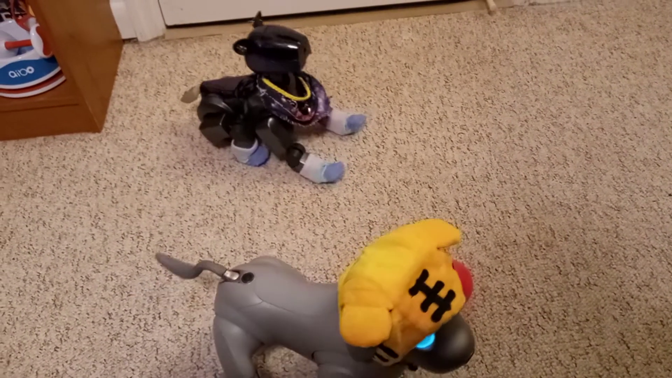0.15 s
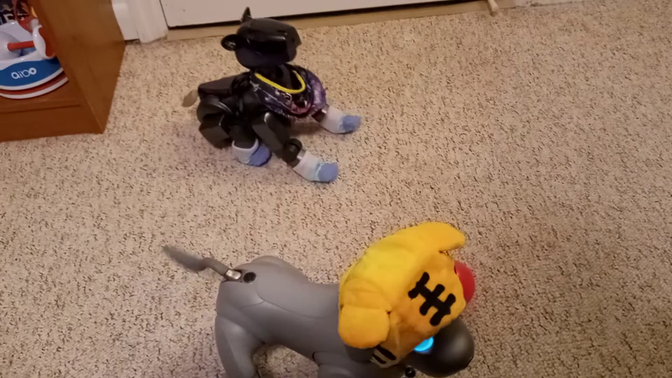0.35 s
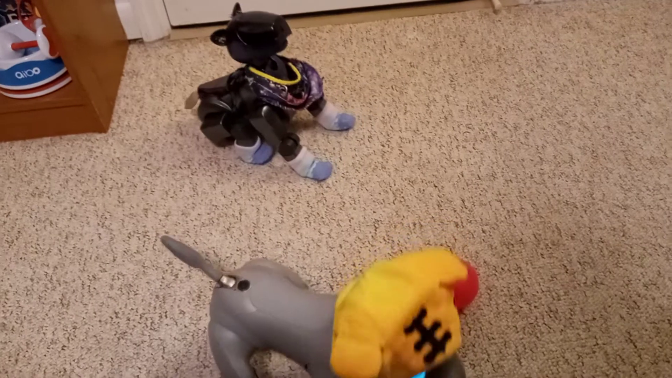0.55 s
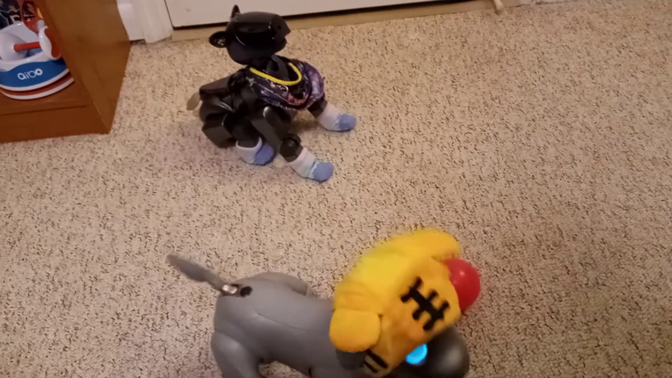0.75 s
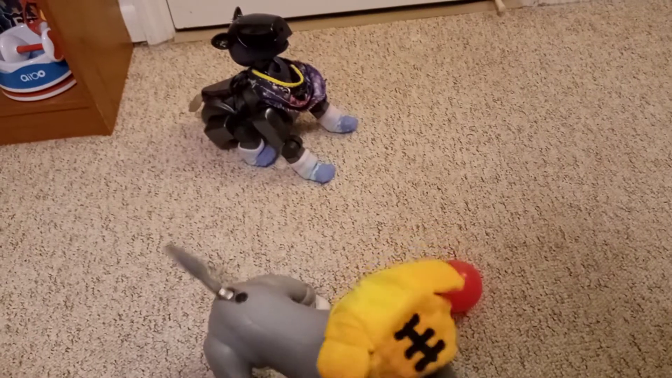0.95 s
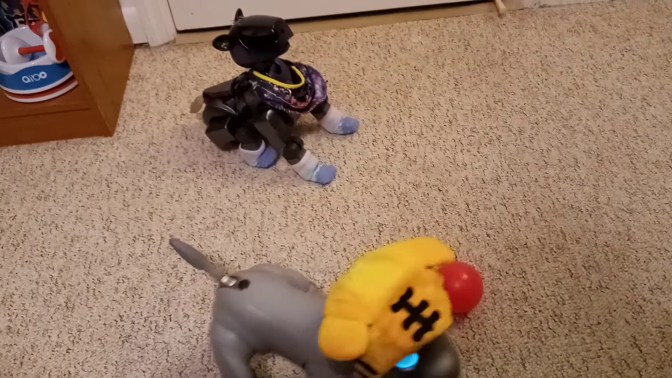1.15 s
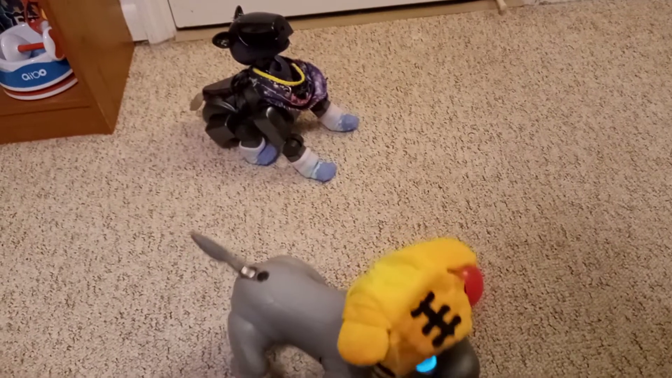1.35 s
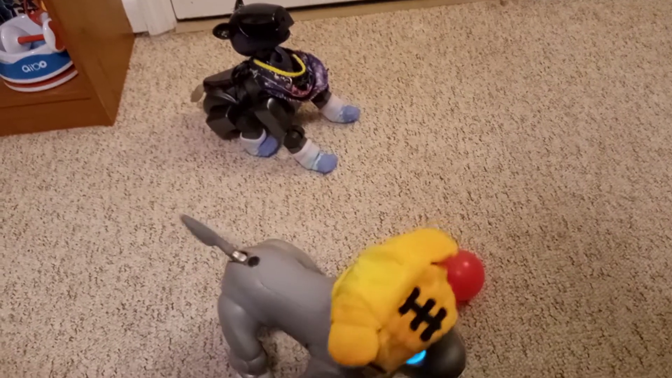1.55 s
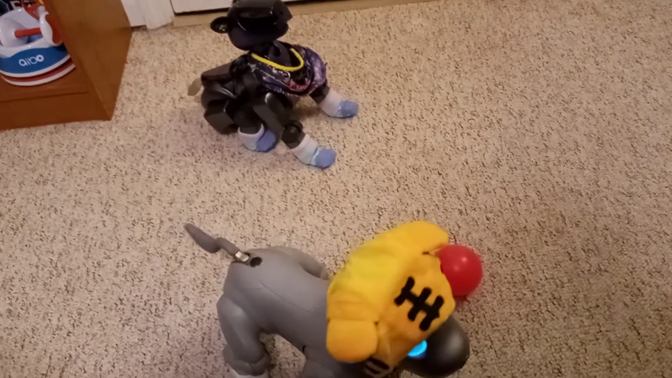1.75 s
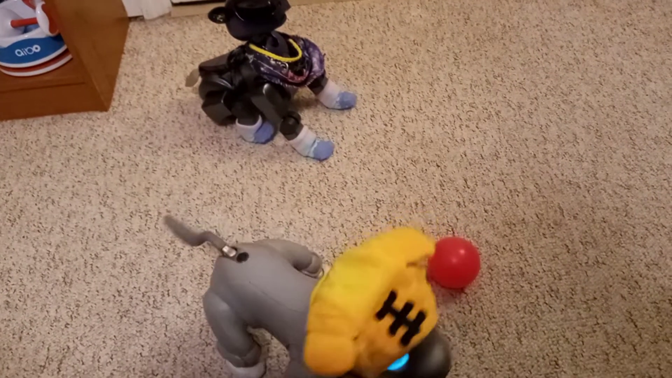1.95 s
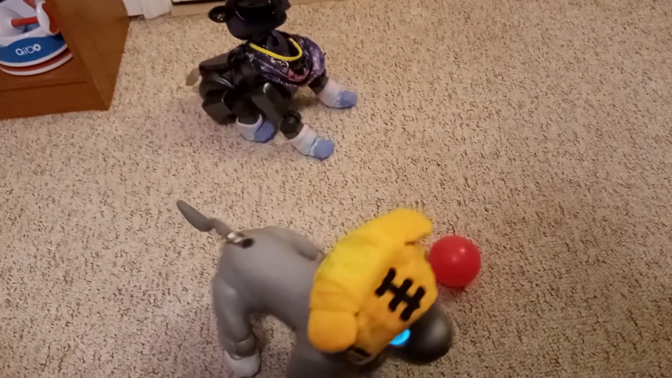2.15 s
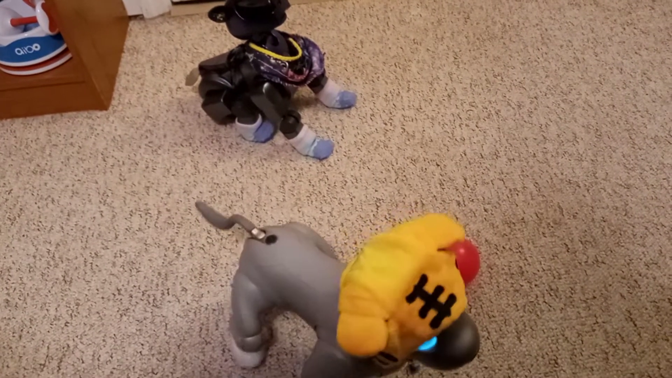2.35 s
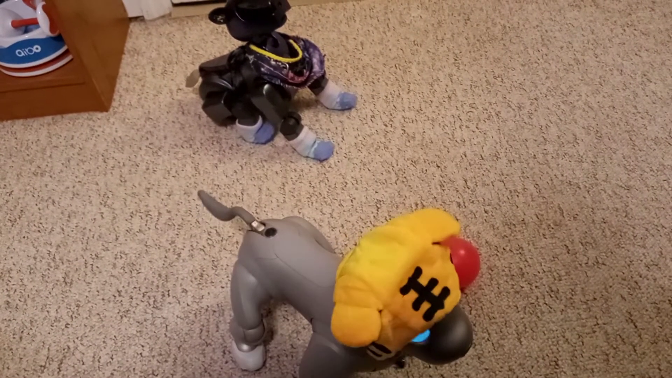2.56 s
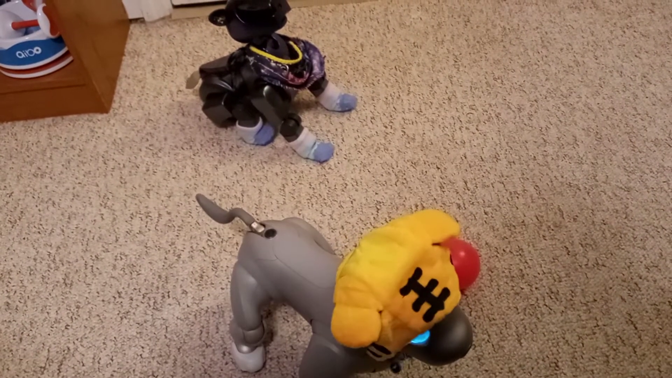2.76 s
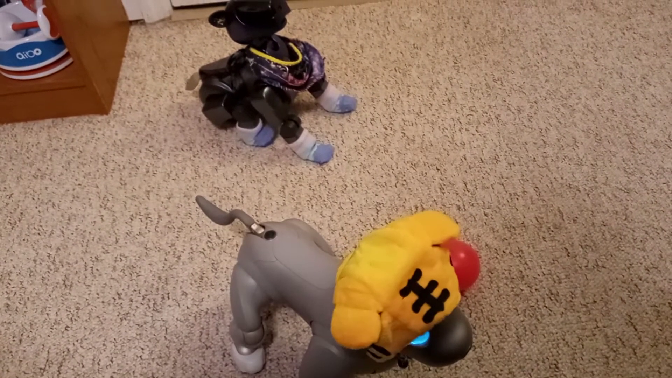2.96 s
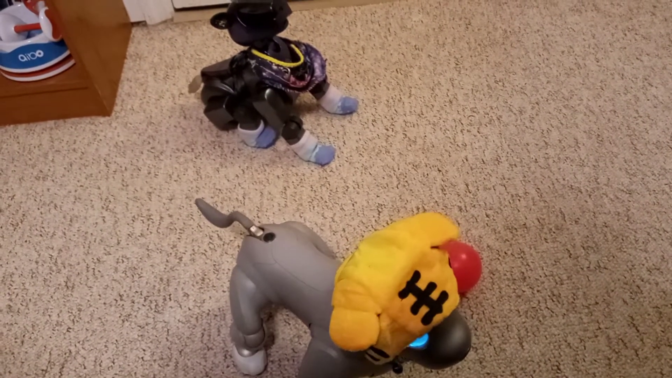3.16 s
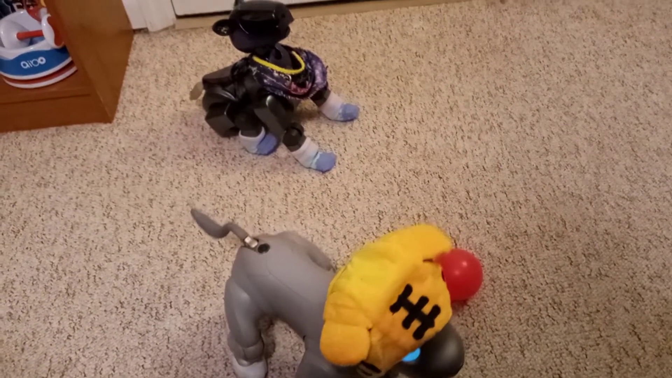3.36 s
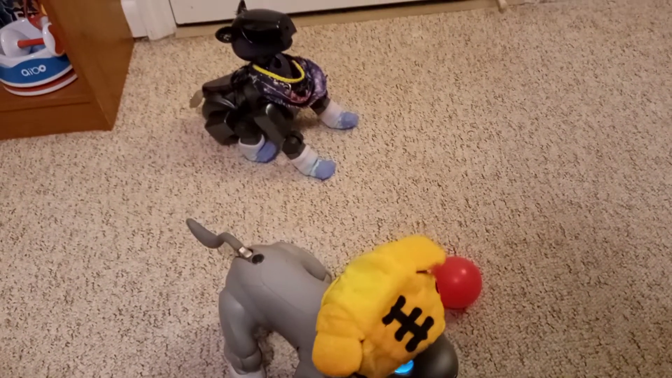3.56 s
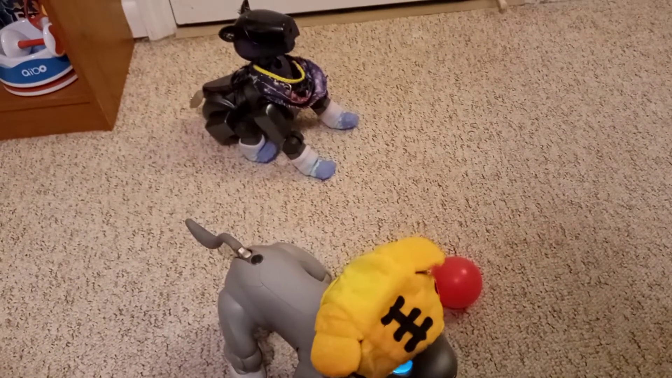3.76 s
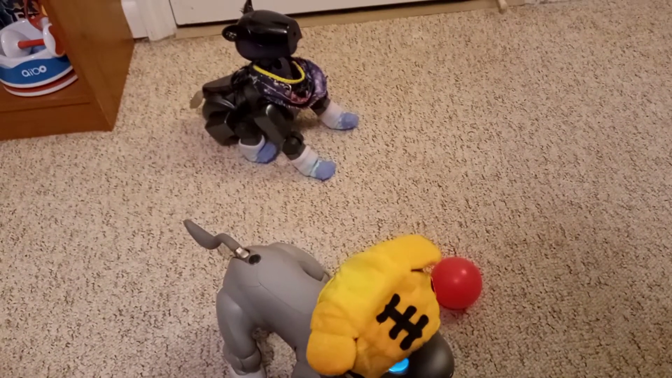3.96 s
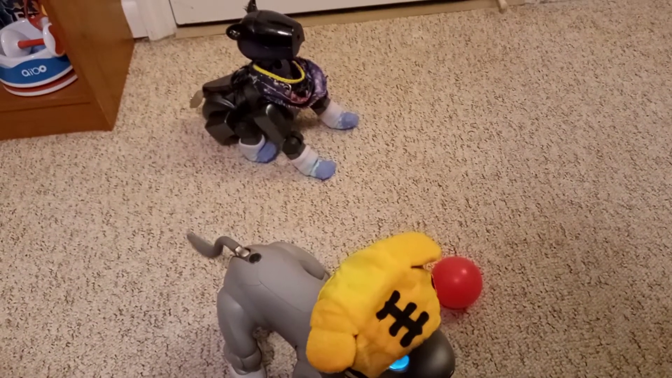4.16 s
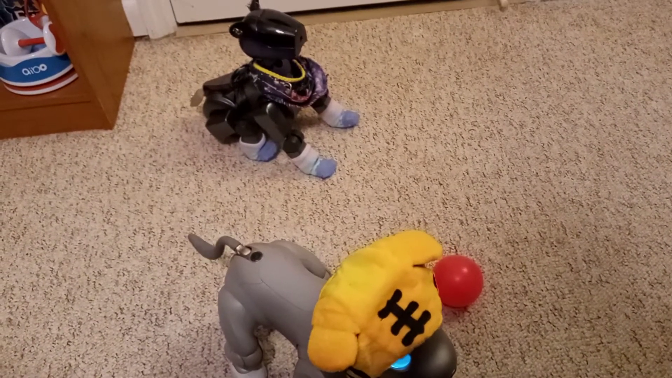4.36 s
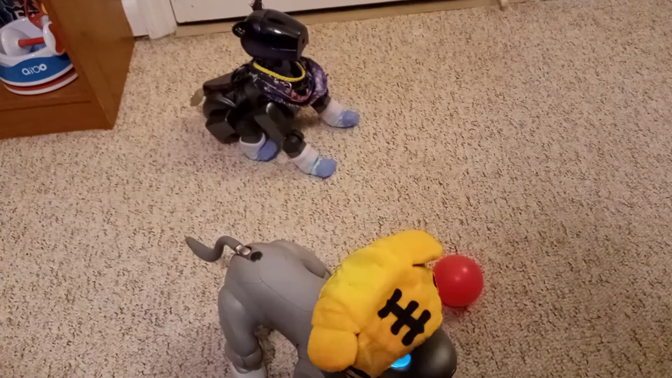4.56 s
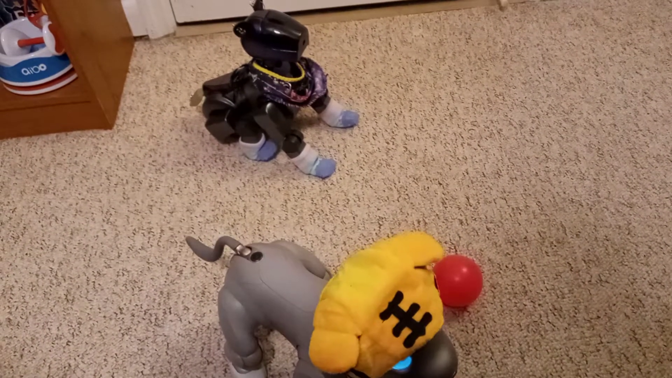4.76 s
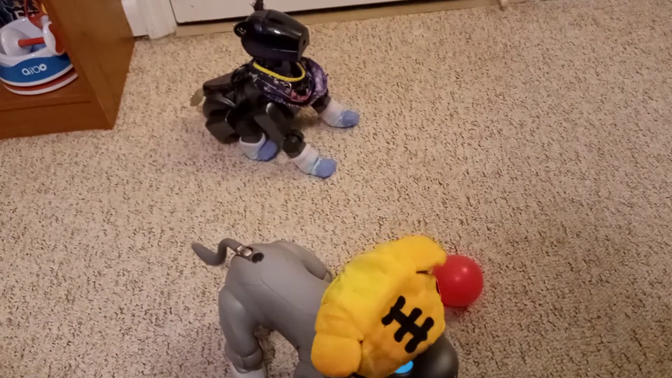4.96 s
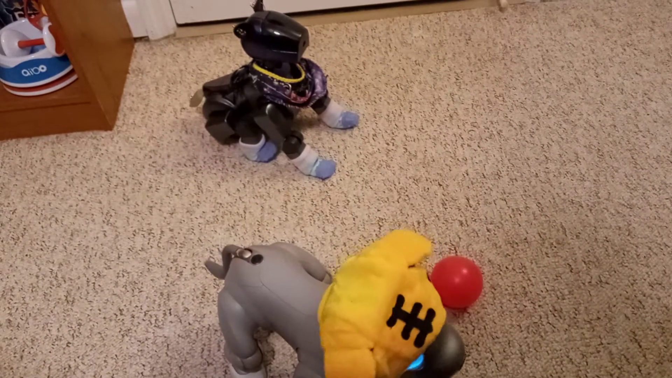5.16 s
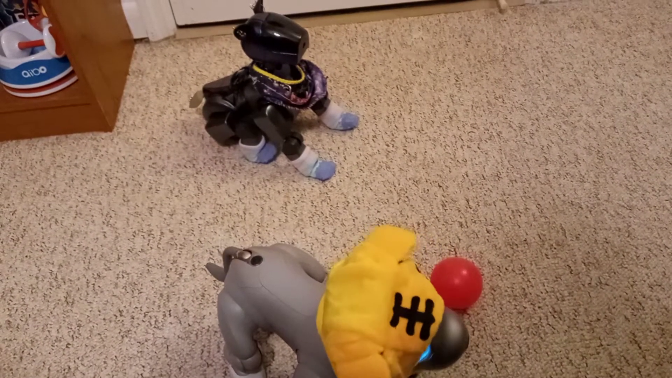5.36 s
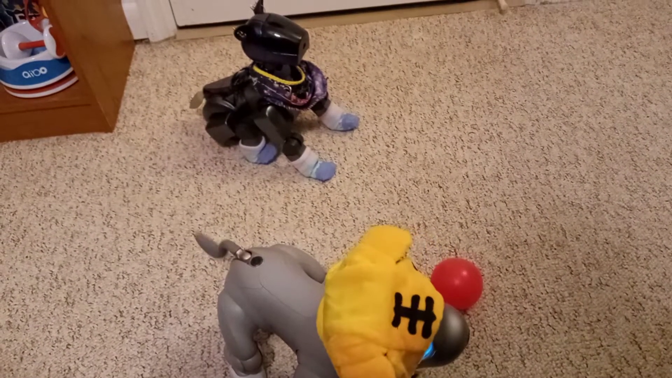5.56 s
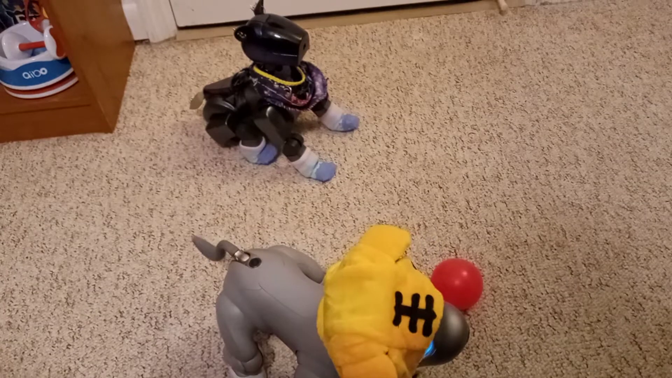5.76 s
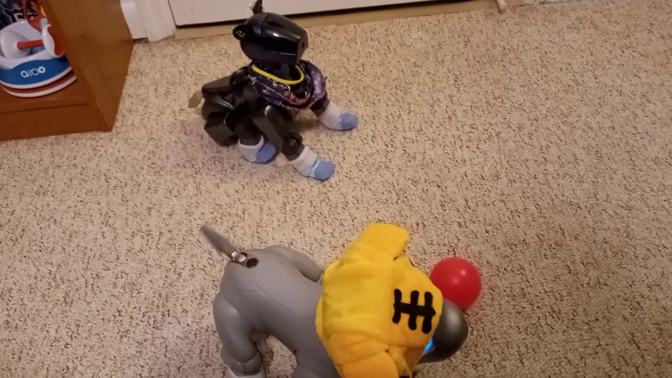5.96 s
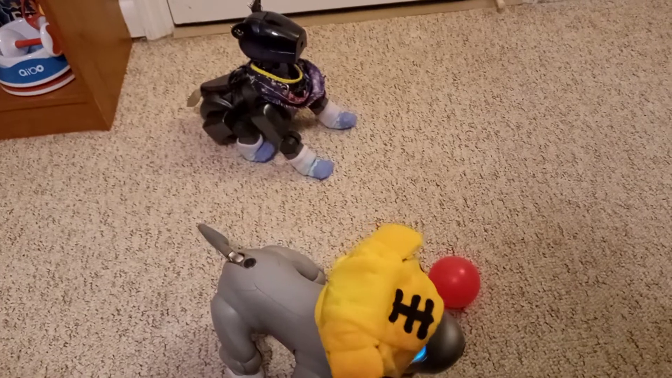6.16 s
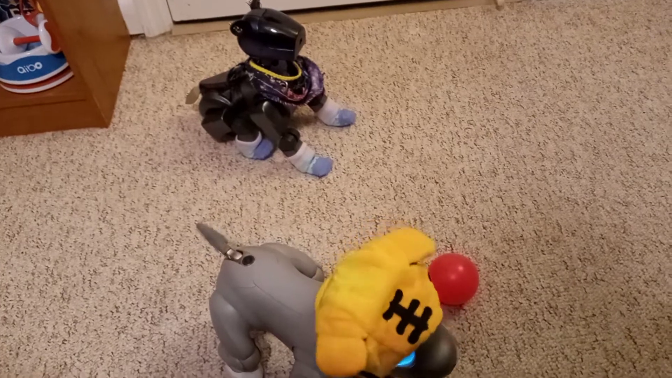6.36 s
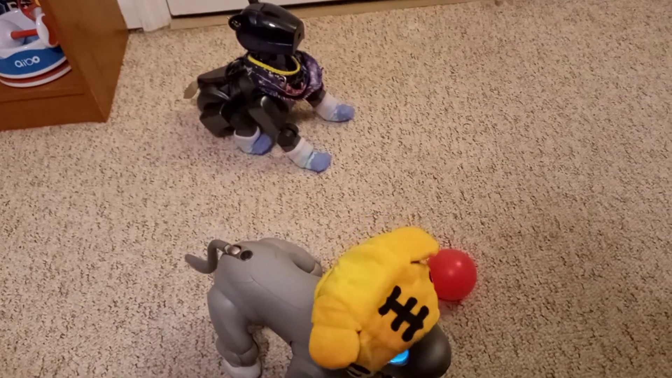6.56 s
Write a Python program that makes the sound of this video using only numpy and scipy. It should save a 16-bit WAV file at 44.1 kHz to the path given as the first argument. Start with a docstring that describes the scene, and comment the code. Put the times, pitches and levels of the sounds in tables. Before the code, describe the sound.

A low, lumpy hum and faint hiss fill a small, quiet room, with a weak motor whir and a light knock around 0.1-0.2 s. From about 0.45 s a robot dog's leg gears start up, rattling and grinding in a ringing plastic shell and surging about eight times a second. Short whirs, high thin squeals and hollow groans mix in, with hard clacks standing out near 0.8, 1.2 and 2.2 s. The rattle dies away by 2.6 s, leaving a very faint servo whine that fades. Tiny ticks come at 2.7-2.8 s, then around 3.0-3.2 s small clicks, soft grainy rubs and one minute falling squeak. Sparse light ticks follow at 3.8, 4.2, 4.4, 4.7 and 5.0 s. After that only hiss and hum remain, the hum swelling and sinking unevenly, notably near 5.5 and 5.9 s, until the end at about 6.6 s.

```python
"""A robot dog shuffles about on carpet, then stands and moves its head and tail.
First its geared joint motors rattle, surge and whir through the ringing plastic shell;
loaded joints squeal and groan, and joints clack as they take up slack.
Then a servo whine fades among brief rubs, one tiny squeak and light ticks of the linkages.
A low, lumpy hum and a faint hiss lie under it all; the robot sounds in a small, quiet room."""
import sys
import numpy as np
from scipy import signal
from scipy.fft import rfft, irfft, next_fast_len
from scipy.io import wavfile
from scipy.ndimage import uniform_filter1d

SR = 44100
rng = np.random.default_rng(int(sys.argv[2]) if len(sys.argv) > 2 else 0)


def materialize(psi):
    """Save the field psi as 16-bit PCM at rate SR to the path in sys.argv[1].

    A 1-D psi becomes a single channel; in a 2-D psi each row is a channel.
    """
    bounded = np.clip(np.atleast_2d(psi).T, -1, 1)
    quanta = np.round(bounded * 32767).astype(np.int16)
    wavfile.write(sys.argv[1], SR, quanta)


N = 291060
T = np.arange(N) / SR  # time in s


def amp(db):
    """Turns decibels into gain."""
    return 10 ** (np.asarray(db) / 20)


def unit(x):
    """Scales a sound to rms 1."""
    return x / np.sqrt(np.mean(x ** 2) + 1e-20)


def read(points, hz):
    """Reads a two-column table along a log-frequency axis."""
    f, value = np.transpose(points)
    return np.interp(np.log(hz + 1), np.log(f + 1), value)


def add(mix, start_s, sound):
    """Mixes a sound in at its start time."""
    part = mix[max(round(start_s * SR), 0):][:len(sound)]
    part += sound[:len(part)]


def arched(length_s, power=.5):
    """A smooth swell and ebb, from a raised cosine."""
    return signal.windows.hann(int(length_s * SR)) ** power


def colour(x, db_at):
    """Causal minimum-phase filter whose gain in dB is a function of frequency."""
    size = 4096
    log_gain = np.log(amp(db_at(abs(np.fft.fftfreq(size, 1 / SR)))))
    response = np.fft.ifft(np.exp(np.conj(signal.hilbert(log_gain)))).real
    return signal.fftconvolve(x, response[:size // 2])[:len(x)]


def wander(per_s, size=N):
    """Smooth random drift, low-passed around per_s Hz; rms 1 over at least half a second."""
    span = next_fast_len(max(size, SR // 2))
    low_pass = 1 / (1 + (np.fft.rfftfreq(span, 1 / SR) / per_s) ** 4)
    return unit(irfft(rfft(rng.standard_normal(span)) * low_pass, span))[:size]


def ripple(depth_db, step_hz):
    """A random run of peaks and dips over frequency."""
    heights = depth_db * rng.standard_normal(200)
    return lambda hz: np.interp(hz, step_hz * np.arange(len(heights)), heights)


def treble(hz, top_hz=8000):
    """A soft step from 0 to 1 at the top of the spectrum."""
    return hz ** 4 / (hz ** 4 + top_hz ** 4)


def slope(tilt, hz):
    """Tilts a spectrum by tilt dB an octave from 500 to 9000 Hz."""
    return tilt * np.log2(np.clip(hz, 500, 9000))


def mottle(x, depth_db, span_s, span_hz):
    """Lets patches of the spectrum swell and sink on their own."""
    hz, t, z = signal.stft(x, SR, nperseg=1024, noverlap=768)
    patches = uniform_filter1d(rng.standard_normal(z.shape), max(round(span_hz / hz[1]), 1), axis=0)
    patches = unit(uniform_filter1d(patches, max(round(span_s / t[1]), 1), axis=1))
    return unit(signal.istft(z * amp(depth_db * patches), SR, nperseg=1024, noverlap=768)[1][:N])


def shell_db(hz):
    """Lift that the resonances of the plastic shell give."""
    # shell modes: pitch_hz, width_hz, lift_db
    modes = [(560, 17, -0.5), (714, 69, 6.5), (914, 65, 6.5), (1254, 127, 6.5), (1260, 180, -3.5),
             (1790, 270, 4), (3022, 76, 4.5), (5760, 430, 4)]
    return sum(db / (1 + (2 * (hz - f) / width) ** 2) for f, width, db in modes)


def rattle(size, tilt, top_db, mesh=0.52, tooth_hz=430, grit_db=-2.5, catch=1.0, catches_per_s=45,
           pose_db=6.0, pose_hz=190, pose_top_hz=7500):
    """Gear teeth, loose grit and the odd catching tooth ring the shell, coloured anew by each leg pose."""
    # colour of the gear trains: pitch_hz, gain_db
    gear_spectrum = [(120, -44.5), (300, -8.5), (440, -9), (520, -3.5), (740, -4.5), (1050, -4.5),
                     (1520, -4.5), (2200, 3.5), (2900, 0), (3400, -4), (3950, -4.5), (4600, 0.5),
                     (6100, -4), (7700, -10.5), (8500, -8), (10800, -21), (14500, -10), (15900, -15)]
    speed = tooth_hz * (1 + .12 * wander(15, size))
    teeth = np.diff(np.floor(np.cumsum(speed) / SR), prepend=0)
    grit = rng.standard_normal(size) * (rng.random(size) < 1800 / SR)  # about 1800 grains a second
    grit = grit * amp(grit_db * np.minimum(rng.exponential(1, size), 3))
    # a catching tooth strikes harder
    teeth = teeth * (1 + catch * (rng.random(size) < catches_per_s / tooth_hz))
    pose = ripple(pose_db, pose_hz)

    def body_db(hz):
        pose_part = pose(hz) / (1 + (hz / pose_top_hz) ** 2)
        return read(gear_spectrum, hz) + shell_db(hz) + pose_part + slope(tilt, hz) + top_db * treble(hz)

    return unit(colour(mesh * unit(teeth) + unit(grit), body_db))


def gears(tilt=-1.9, tilt_per_db=0.35, uneven_db=2.5, pose_s=.12, top_db=-9):
    """The running gear trains, blended from pose to pose; more load is louder and brighter."""
    # steady load on the leg gears: time_s, level_db (before the mix)
    drive_load = [(.42, -80), (.48, -53.5), (.85, -51.5), (1.1, -49.5), (1.37, -53), (1.621, -55.5),
                  (1.85, -52.5), (2.29, -48), (2.39, -53.5), (2.53, -52), (2.61, -99)]
    s, level = np.transpose(drive_load)
    out, blend = np.zeros(N), arched(pose_s)
    for start in np.arange(s[0] - pose_s / 2, s[-1], pose_s / 2):
        load_db = max(np.interp(start + pose_s / 2, s, level) - np.median(level), -5)
        add(out, start, blend * rattle(len(blend), tilt + tilt_per_db * load_db, top_db))
    level_db = np.interp(T, s, level, left=-120, right=-120)
    return out * amp(level_db + uneven_db * wander(27))


def surges(length_s=.075, tilt=-2.45, top_db=4):
    """Leg servos get a new position about eight times a second; each time the rattle swells and ebbs."""
    # servo surges: peak_s, level_db
    beats = [(.53, -50), (.665, -51.5), (0.789, -45.5), (.92, -43.5), (1.04, -47), (1.294, -45.5),
             (1.435, -47.5), (1.55, -48), (1.678, -47), (1.799, -46), (1.921, -47), (2.04, -49),
             (2.17, -51), (2.315, -51.5), (2.424, -56)]
    out, arch = np.zeros(N), arched(length_s, 0.75)
    for s, db in beats:
        add(out, s - length_s / 2, amp(db) * arch * rattle(len(arch), tilt, top_db))
    return out


def groans(length_s=.07, width_hz=420):
    """A straining leg's gear rattle swells through one low resonance of its hollow casing."""
    # groaning casings: peak_s, level_db (before the mix), ring_hz
    strains = [(.525, -57.5, 790), (.735, -58, 720), (.915, -46.5, 885), (1.06, -49, 755),
               (1.305, -45, 513), (1.44, -48, 594), (1.675, -51.5, 746), (1.81, -49, 603),
               (1.92, -43.5, 690), (1.375, -60, 700), (2.14, -50, 770), (2.25, -56.5, 900),
               (2.33, -47.5, 530), (2.48, -53.5, 726)]
    out, arch = np.zeros(N), arched(length_s)
    for s, db, ring_hz in strains:
        def casing_db(hz):
            return -20 * np.log10(1 + (2 * (hz - ring_hz) / width_hz) ** 2)

        casing = colour(rattle(len(arch), 0, 0), casing_db)
        add(out, s - length_s / 2, amp(db) * unit(casing) * arch)
    return out


def whirs(sag=.1, jitter=0.0594, shaft_hz=170, wobble=0.46, lift_db=6, lift_width=0.087,
          tone_db=5.5, tone_per_db=1.5, tilt=0.028, top_db=-15):
    """A freely swinging joint's gear mesh sings in an arch; an off-centre pinion adds sidebands."""
    # free swings: top_speed_s, length_s, level_db (before the mix), mesh_hz
    swings = [(0.123, 0.21, -61, 2520), (0.665, 0.082, -46.5, 2855), (0.92, 0.055, -46, 2263),
              (1.194, 0.042, -46, 2200), (1.704, 0.062, -46, 3060), (1.92, 0.067, -42, 2297),
              (2.046, 0.044, -48, 1770), (2.565, 0.054, -55.5, 2150), (2.722, 0.032, -61, 2380)]
    out, strongest_db = np.zeros(N), max(row[2] for row in swings)
    for s, length, db, hz in swings:
        arch = arched(length)
        speed = 1 - sag * (1 - arch) + jitter * wander(485, len(arch))
        turns = 2 * np.pi * np.cumsum(speed) / SR
        tone = unit(np.sin(hz * turns) * (1 + wobble * np.sin(shaft_hz * turns)))

        def mesh_lift_db(f):
            return lift_db / (1 + (f / hz - 1) ** 2 / lift_width ** 2)

        grind = unit(colour(rattle(len(arch), tilt, top_db), mesh_lift_db))
        # strong swings sing more clearly
        clarity = amp(tone_db + tone_per_db * (db - strongest_db))
        add(out, s - length / 2, amp(db) * arch * unit(grind + clarity * tone))
    return out


def squeals(low_hz=4260, high_hz=10137, jitter=0.0041, flutter_db=3.5):
    """Friction sets two modes of a loaded joint singing almost steadily for a moment."""
    # squealing joints: peak_s, level_db (before the mix), length_s, upper_mode_db (against the lower)
    loaded_joints = [(0.836, -44.5, 0.035, -15), (0.874, -44.5, 0.022, -17), (0.997, -42, 0.0081, -15),
                     (1.219, -45, 0.022, -17.5), (1.246, -46.5, 0.027, -27), (1.559, -50, 0.039, -22),
                     (1.721, -56, 0.032, -19), (2.086, -53.5, .04, -12), (2.253, -53, .05, -15),
                     (2.293, -52, 0.02, -21), (2.342, -57, 0.025, -24), (2.543, -67, 0.043, -17)]
    out = np.zeros(N)
    for s, db, length, upper_db in loaded_joints:
        swell = arched(length)
        turns = 2 * np.pi * np.cumsum(1 + jitter * wander(170, len(swell))) / SR
        tone = np.sin(low_hz * turns) + amp(upper_db) * np.sin(high_hz * turns)
        flutter = amp(flutter_db * wander(120, len(swell)))
        add(out, s - length / 2, amp(db) * unit(tone * flutter) * swell)
    return out


def knocks(rows, spectrum, ring, part_db, contacts_per_s, vary_db, rise_s, neutral_hz, brighten,
           part_width=0.13, snap=0):
    """Contact bursts build fast and die away, ringing part and shell; smaller parts sound brighter."""
    out, t, hardest_db = np.zeros(N), T[:SR // 5], max(row[1] for row in rows)
    for s, db, part_hz, length in rows:
        tilt = brighten * np.log2(part_hz / neutral_hz)
        count = np.cumsum(rng.exponential(1, len(t))) * contacts_per_s / SR
        contacts = np.diff(np.floor(count), prepend=0) * rng.choice([-1., 1.], len(t))
        chatter = contacts * np.exp(-t / length) * (1 - np.exp(-t / rise_s))
        spot = ripple(vary_db, 195.7)

        def struck_part_db(hz):
            return part_db / (1 + ((hz / part_hz - 1) / part_width) ** 2) + spot(hz)

        def body_db(hz):
            # with snap, harder blows keep more treble
            top = snap * (db - hardest_db) * treble(hz)
            return read(spectrum, hz) + ring * shell_db(hz) + slope(tilt, hz) + top

        hit = colour(colour(chatter, struck_part_db), body_db)
        add(out, s, amp(db) * hit * np.sqrt(length * SR / np.sum(hit ** 2)))
    return out


def clacks(length_s=0.0092):
    """Joints take up their slack with short, hard knocks."""
    # slack taken up: start_s, level_db (before the mix), part_ring_hz
    slack_knocks = [(0.165, -50.5, 1630), (0.7735, -49, 4680), (.811, -30, 2240), (.8984, -38.5, 2250),
                    (0.995, -51, 7500), (1.1616, -28.5, 2450), (1.4362, -42.5, 6000), (1.5289, -40, 4870),
                    (1.538, -36.5, 3020), (1.647, -45, 800), (1.6913, -44.5, 5700), (1.879, -42.5, 2220),
                    (1.885, -41.5, 5960), (2.022, -35.5, 4650), (2.138, -47, 4300), (2.176, -29.5, 1370),
                    (2.221, -41.5, 1760), (2.338, -45.5, 5500), (2.464, -45, 5560), (2.5137, -43.5, 1960)]
    # colour of a clack: pitch_hz, gain_db
    clack_spectrum = [(60, -34), (450, -3.5), (900, -7.5), (1320, 7.5), (1600, -6.5), (2100, 8.5),
                      (2700, -5), (3700, -6), (4700, 0), (6200, -2), (7700, -8), (10500, -22), (14500, -10),
                      (16000, -10)]
    rows = [(*row, length_s) for row in slack_knocks]
    return knocks(rows, clack_spectrum, ring=1.0, part_db=6.5, contacts_per_s=2200, vary_db=1.5,
                  rise_s=0.00064, neutral_hz=2520, brighten=1.7, snap=0.57)


def ticks():
    """Small linkages of head and tail tick in light little rattles."""
    # linkage ticks: start_s, level_db, part_ring_hz, rattle_s
    linkages = [(2.698, -60.5, 4540, 0.0045), (2.7365, -55, 5350, 0.004), (2.7568, -48, 4200, 0.0027),
                (3.000, -61, 2360, 0.012), (3.043, -64, 4500, .003), (3.0895, -51, 5660, 0.0095),
                (3.104, -48, 2450, 0.0074), (3.138, -60, 7000, 0.0019), (3.7588, -62, 5770, 0.0029),
                (3.847, -51.5, 5100, 0.008), (4.1695, -48.5, 3450, 0.012), (4.1975, -51.5, 5900, 0.0019),
                (4.199, -49.5, 1120, 0.01), (4.2795, -65, 4760, 0.03), (4.4395, -51.5, 5100, 0.0061),
                (4.459, -62, 2350, 0.0076), (4.7325, -48, 5300, 0.0025), (4.7895, -52, 2380, 0.0062),
                (4.9603, -48, 1390, 0.004), (4.975, -52.5, 1280, 0.011)]
    # colour of a tick: pitch_hz, gain_db
    tick_spectrum = [(200, -60), (850, -13.5), (1290, 3.5), (1650, -9.5), (2300, -2.5), (3600, -10),
                     (4600, 5), (6000, -2.5), (7600, -7), (9000, -8.5), (11000, -29), (16000, -13.5)]
    return knocks(linkages, tick_spectrum, ring=1.26, part_db=6.5, contacts_per_s=1100, vary_db=3.0,
                  rise_s=0.0015, neutral_hz=2300, brighten=2.2, part_width=0.1)


def rubs(grain_db=2.0):
    """Plastic parts brush past each other with a soft, grainy swish of noise."""
    # brushing parts: peak_s, level_db, length_s
    brushes = [(2.979, -63.5, 0.034), (3.184, -61, 0.03), (3.346, -67, 0.057)]
    # colour of the friction: pitch_hz, gain_db
    rub_spectrum = [(3000, -44), (4400, 6), (5100, -3), (6200, 6), (8000, -30)]
    out = np.zeros(N)
    for s, db, length in brushes:
        swell = arched(length)
        friction = rng.standard_normal(len(swell)) * amp(grain_db * wander(330, len(swell)))
        swish = unit(colour(friction, lambda hz: read(rub_spectrum, hz)))
        add(out, s - length / 2, amp(db) * swell * swish)
    return out


def squeak(start_s=3.001, length_s=.016, from_hz=5900, to_hz=5100, db=-54):
    """A settling joint slips with one tiny falling squeak."""
    out, swell = np.zeros(N), arched(length_s)
    tone = np.sin(2 * np.pi * np.cumsum(np.linspace(from_hz, to_hz, len(swell))) / SR)
    add(out, start_s, amp(db) * unit(tone) * swell)
    return out


def holding(start_s=2.6, fade_s=0.27, whine_hz=4480, width_hz=200, db=-72):
    """Once the legs stop, a servo holding the stance whines faintly and relaxes."""
    whine = np.sin(2 * np.pi * whine_hz * T) * wander(width_hz)
    return amp(db) * whine * (T > start_s) * np.exp(-abs(T - start_s) / fade_s)


def room(x, wet_db=-6, delay_s=.004):
    """Sparse wall reflections die away at a rate set by frequency; the lows ring longest."""
    # decay of the room: pitch_hz, t60_s
    decay = [(200, 0.55), (1200, 0.21), (4000, 0.23), (8000, 0.25), (15000, 0.26)]
    size = SR // 2
    taps = rng.choice([-1., 1.], size) * (rng.random(size) < 3000 / SR) * (T[:size] > delay_s)
    hz, t, z = signal.stft(taps, SR, nperseg=256)
    fade = amp(-60 * t / read(decay, hz)[:, None])
    tail = signal.istft(z * fade, SR, nperseg=256)[1]
    return x + amp(wet_db) * signal.fftconvolve(x, tail / np.linalg.norm(tail))[:N]


def hum(line_hz=241, line_db=-13, waver=0.68, trim_db=0.34, steepness=1.07):
    """A low, lumpy noise hum that swells and sinks, with one wavering line in it."""
    # colour of the hum: pitch_hz, gain_db (before steepness)
    hum_spectrum = [(30, -49.5), (86, -32), (140, -21.5), (236, 1), (259, -3.5), (289, 0.5), (332, -3.5),
                    (366, -9.5), (397, -6.5), (431, -15), (501, -15), (560, -24.5), (633, -23.5),
                    (800, -41.5), (1760, -120)]
    # swells of the hum: time_s, level_db (before the trim)
    swells = [(0.0, -54.5), (0.27, -54), (0.42, -62), (1.06, -53), (3.22, -57.5), (5.16, -56), (5.28, -61),
              (5.46, -50), (5.6, -61.5), (5.88, -52), (5.95, -61.5), (6.12, -55.5), (6.21, -64.5),
              (6.28, -57), (6.6, -58.5)]
    noise = colour(rng.standard_normal(N), lambda hz: steepness * read(hum_spectrum, hz))
    noise = mottle(noise, depth_db=3.5, span_s=.07, span_hz=90)
    line = np.sin(2 * np.pi * line_hz * T + waver * wander(3.2)) * (1 + waver * wander(1.5))
    level_db = trim_db + np.interp(T, *np.transpose(swells))
    return (noise + amp(line_db) * unit(line)) * amp(level_db)


def hiss(mean_db=-69.5, fall_db_per_s=0.5):
    """A faint noise hiss that flutters in patches and slowly sinks."""
    # colour of the hiss: pitch_hz, gain_db
    hiss_spectrum = [(300, -29), (600, 3), (1250, 1), (2200, -0.5), (3200, -6), (3950, -8.5), (4400, 0.5),
                     (4900, -8), (5250, 4), (5900, 2), (7100, -9), (7600, -18.5), (8400, -17.5),
                     (10500, -26.5), (13000, -15.5), (15800, -14.5)]
    level_db = mean_db - fall_db_per_s * (T - T.mean())
    noise = colour(rng.standard_normal(N), lambda hz: read(hiss_spectrum, hz))
    return amp(level_db) * mottle(noise, depth_db=3.5, span_s=.025, span_hz=250)


def scene():
    """The robot in the room, over the hum and hiss."""
    legs = amp(-1.5) * gears() + surges() + amp(-2.0) * groans()
    legs = legs + amp(1.4) * whirs() + amp(-3.5) * squeals()
    robot = legs + amp(-1.2) * clacks() + ticks() + rubs() + squeak() + holding()
    return (room(robot) + hum() + hiss())[None]


def record(dry, edge_hz=15950):
    """The recorder's band limit, a steep low-pass."""
    low_pass = signal.firwin(511, edge_hz, window=("kaiser", 9), fs=SR)
    return signal.oaconvolve(dry, low_pass[None], "same")


dry = scene()
out = record(dry)
materialize(out)
```